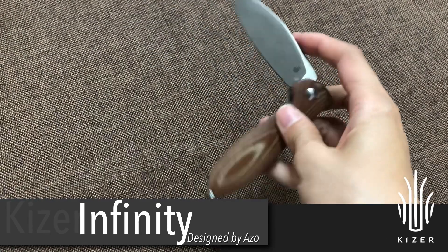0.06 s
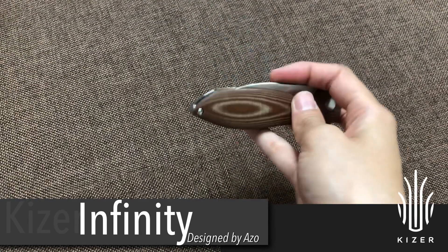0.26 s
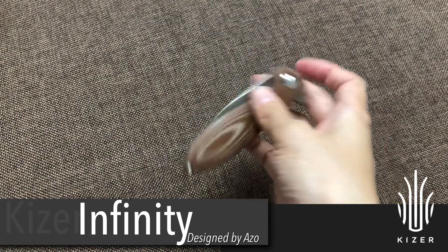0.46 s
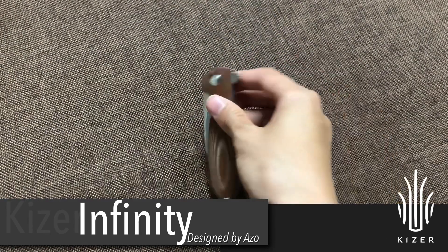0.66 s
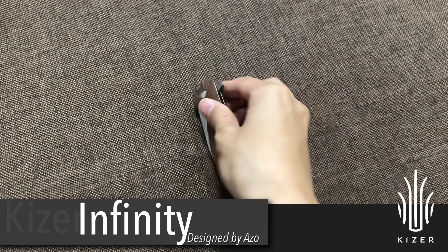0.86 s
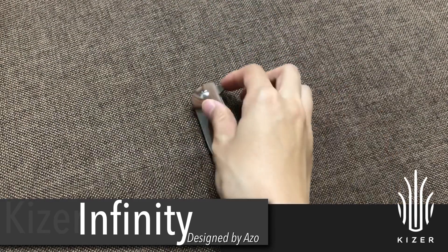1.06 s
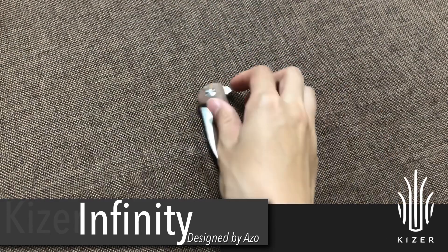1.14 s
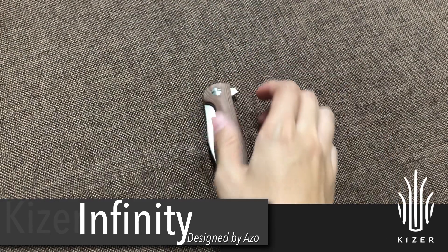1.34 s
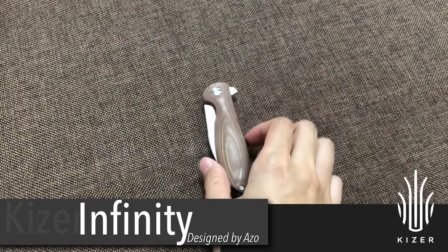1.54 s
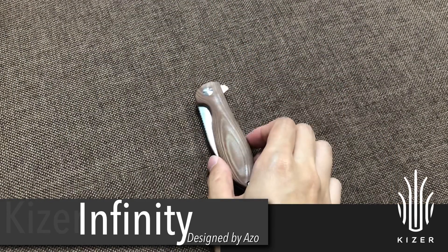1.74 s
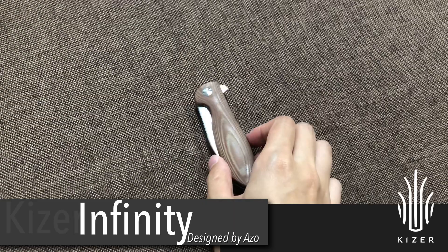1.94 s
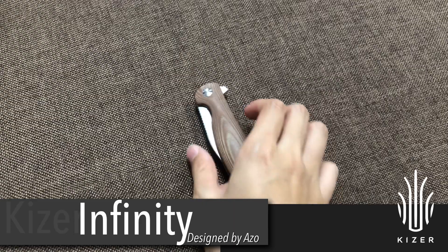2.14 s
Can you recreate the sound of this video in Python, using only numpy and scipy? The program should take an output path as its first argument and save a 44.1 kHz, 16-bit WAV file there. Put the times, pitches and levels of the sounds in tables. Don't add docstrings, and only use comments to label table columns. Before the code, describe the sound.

A folding pocket knife snaps with a loud, bright steel crack, then knocks dully on a cloth-covered hollow table, bounces and is set down softly; faint finger brushing follows, close microphone, quiet room.

```python
import sys
import numpy as np
from scipy import signal
from scipy.fft import rfft, irfft
from scipy.io import wavfile
from scipy.ndimage import uniform_filter1d

SR = 44100
rng = np.random.default_rng(int(sys.argv[2]) if len(sys.argv) > 2 else 0)


def persist_wave(psi):
    counts = np.round(np.clip(psi, -1, 1) * 32767).astype(np.int16)
    wavfile.write(sys.argv[1], SR, np.atleast_2d(counts).T)


def to_linear_factor(level_db):
    exponent = np.asarray(level_db, float) / 20
    return 10 ** exponent


N = 97020

# start in seconds, chatter length in seconds.
SNAP_CONTACTS = [
    (.2208, .004),
    (.2259, .0017),
    (.2274, .0009),
    (.2345, .0018),
    (.2362, .0012),
    (.2405, .002),
]
# level in dB, brightness in dB per octave, ring in dB.
SNAP_FORCE = [
    (-46, 3, 8),
    (-2.5, -1, -3.5),
    (-0.5, -5.5, -21),
    (-6, -0.5, -13),
    (-9, -1, -9),
    (-17, -5, -8.5),
]
# frequency in Hz, density in dB per Hz.
CRACK_SPECTRUM = [(1200, -39.5), (3300, -27.5), (5200, -19), (8700, -5), (11500, -2), (14500, -12),
                  (15500, -7.5), (16000, -33.5)]
# frequency in Hz, level in dB, T60 in seconds.
BLADE_MODES = [(1050, -21, 0.028), (1777, -23.5, .04), (2255, -27, .04), (3990, -24, 0.02),
               (5171, -14.5, 0.048), (6610, -18.5, 0.019), (7370, -18.5, 0.03), (7840, -15, 0.024),
               (9570, -15, .03), (11070, -8.5, .035), (12940, -14, .04), (12860, -9, 0.018),
               (13400, -15.5, 0.02), (15200, -16, 0.015)]
# frequency in Hz, level in dB, T60 in seconds.
STOP_MODES = [(370, -34.5, .03), (780.4, -34, .04), (910, -36, 0.045), (5175, -20, 0.059),
              (8637, -9.5, .06), (11060, -22, .05), (15560, -22, .04)]
# delay in seconds, level in dB.
SNAP_ECHOES = [
    (0.0252, -34),
    (0.0363, -29),
]
# start in seconds, level in dB.
WALL_CRACKS = [
    (0.2262, -8),
    (.2350, -13),
]
# frequency in Hz, density in dB per Hz.
WALL_SPECTRUM = [(600, -25), (1500, -22.5), (3000, -21.5), (5200, -10), (8000, -3), (11500, -2.5),
                 (16000, -3)]
# frequency in Hz, level in dB, T60 in seconds.
WALL_MODES = [(2256, -32, .02), (5140, -16, .015), (7270, -10, .008), (8720, -18, .015),
              (11000, -12, 0.011), (15200, -11.5, .006)]
# centre in Hz, width in Hz, level in dB, peak in seconds, length in seconds.
PIVOT_BANDS = [(1790, 150, -64.5, 0.12, 0.12), (3110, 210, -70, 0.062, 0.054),
               (4050, 300, -61, .155, 0.046), (6500, 680, -72, 0.057, 0.017), (6900, 500, -67, 0.18, 0.04),
               (8800, 180, -65, 0.22, 0.091), (10430, 250, -65.5, .05, 0.1), (12800, 400, -61.5, .13, .08),
               (14400, 400, -74, .14, .06), (6340, 3100, -66, 0.0051, 0.024), (5557, 1300, -61, 0.17, .06)]
# start in seconds, level in dB, pitch in Hz, ring in dB.
TICK_EVENTS = [(.008, -54.5, 10500, -21), (.2030, -46.5, 11100, -5.5), (.2120, -52.5, 13300, -16),
               (.2150, -50, 11300, 0), (.493, -60, 10750, -9.5), (.499, -57.5, 14300, -18.5),
               (.503, -58, 10730, -10), (.509, -59, 10700, -10), (.590, -51, 14000, -24.5),
               (0.6284, -34.5, 10440, -13.5), (0.629, -33.5, 3298, -13.5), (0.684, -46, 10750, -11),
               (.6836, -52, 14500, -11), (0.7339, -55, 9730, -25), (0.7414, -60, 10750, -5),
               (0.755, -63.5, 10700, -3), (0.7659, -58, 10700, -6), (0.7688, -47, 7700, -23),
               (.7690, -47, 2100, -10), (.7690, -52, 3370, -7), (.7780, -60.5, 10700, -7.5),
               (.8115, -51.5, 13200, -28), (0.8988, -48.5, 5500, -11.5), (.915, -51.5, 14700, -16),
               (0.921, -52.5, 14900, -12), (.930, -52.5, 14790, -17), (.9400, -50.5, 6200, -33)]
# start in seconds, level in dB, contact cut-off in Hz.
TABLE_KNOCKS = [
    (.6290, -12, 1330),
    (0.6346, -21, 1250),
    (0.6387, -19, 990),
    (0.767, -45, 1500),
    (0.9393, -32.5, 780),
    (0.9434, -33.5, 387),
]
# frequency in Hz, level in dB, T60 in seconds.
THUD_MODES = [(229, 3, 0.021), (337, 4, 0.025), (508.5, 1, 0.055), (656, -0.5, 0.022), (862, 0.5, 0.074),
              (1074, 0.5, 0.0136)]
# frequency in Hz, T60 in seconds.
TABLE_MODES = [(128.3, .5), (165.8, 1.1), (199, .33), (274, .12), (327, .45), (491, .25), (535, .33),
               (597, .28), (800, .4), (868, .36), (904, .36), (1020, .3), (1104, .31), (1180, .25)]
TABLE_STRUCK_DB = [-6.5, -1.5, -1.5, -4, -0.5, -10, -0.5, 1, -9, -1.5, -7.5, -20.5, -6.5, -5]
# start in seconds, length in seconds, pitch in Hz, level in dB.
ROCKS = [
    (0.95, 0.0477, 325, -30.5),
    (.965, 0.11, 165, -41.5),
    (.9395, 0.021, 206, -31),
]
# frequency in Hz, density in dB per Hz.
SHUDDER_SPECTRUM = [(150, -2), (500, -1), (1150, -7), (1500, -19), (2500, -22.5), (5000, -37)]
# start in seconds, pitch in Hz, level in dB, T60 in seconds.
FRAME_BUMPS = [
    (0.642, 79, -36.5, 0.23),
    (.950, 80, -39.5, 0.19),
    (1.004, 56.3, -37, 0.116),
]
# time in seconds, level in dB.
BRUSH_ENVELOPE = [(.45, -69.5), (.58, -58), (.66, -61.5), (.8, -57.5), (.87, -62), (.93, -62.5),
                  (.99, -59.5), (1.03, -71), (1.18, -67.5), (1.23, -63), (1.3, -59.5), (1.42, -62),
                  (1.52, -70), (1.9, -83), (2.05, -70.5), (2.2, -65)]
# frequency in Hz, density in dB per Hz.
CLOTH_SPECTRUM = [(700, -1.5), (1200, 1), (3000, -3), (5000, -5.5), (9000, -9.5), (16000, -13)]
# frequency in Hz, density in dB per Hz.
AIR_SPECTRUM = [(18, -30), (30, -3.5), (54, -2.5), (87, -10), (185, -8), (214, -9.5), (535, -19.5),
                (1500, -32), (1950, -65), (3300, -120)]
# frequency in Hz, density in dB per Hz.
HISS_SPECTRUM = [(880, -30), (1500, -4.5), (2400, -5.5), (2650, -6), (4970, -8), (6940, -9.5),
                 (15700, -11.5)]
# frequency in Hz, T60 in seconds, level in dB.
ROOM_DECAY = [(152.3, 0.87, -13.5), (586.7, 0.53, -11.5), (2446, 0.63, -12), (7200, 0.32, -9),
              (14000, 0.58, -23)]

STOP_S = SNAP_CONTACTS[1][0]
ATTACK_S, CRACK_T60_S = .0008, .004
RATTLE_DB, RATTLE_T60_S = -17, 0.037
BLADE_SPREAD_DB = 2.5
SEATED_S, SEATED_T60_S = .2445, .015
TICK_T60_S, TICK_WIDE_S = .01, .004
TABLE_DB = -15.5
SHUDDER_DB, SHUDDER_T60_S = -17.5, 0.48
PALM_S, PALM_T60_S = 1.042, .12
GRAINS_PER_S, GRAIN_SPREAD_DB = 9000, 1.5
AIR_DB, HISS_DB = -50.5, -65.5
FIRST_WALL_S, BUILD_S = 0.0063, 0.0089
RING_SEND_DB, TABLE_SEND_DB = -8.5, -6
OVERLOAD = 1.0


def at_hz(points, hz, axis=1):
    points = np.array(points)
    return np.interp(np.log(hz), np.log(points[:, 0]), points[:, axis])


def rms_one(x):
    return x / np.sqrt(np.mean(x ** 2) + 1e-20)


def filtered(x, order, hz, kind):
    return signal.sosfilt(signal.butter(order, hz, kind, fs=SR, output="sos"), x)


def gain_over_time(rows):
    s, db = np.transpose(rows)
    return to_linear_factor(np.interp(np.arange(N) / SR, s, db, left=-120, right=-120))


def colour(x, spectrum, tilt_db=0.):
    hz = np.maximum(np.fft.rfftfreq(len(x), 1 / SR), 1)
    inside = (hz >= spectrum[0][0]) & (hz <= spectrum[-1][0])
    gain = to_linear_factor(at_hz(spectrum, hz) + tilt_db * np.log2(hz / 8000))
    return irfft(rfft(x) * inside * gain, len(x))


def ring(x, hz, t60_s):
    r, w = to_linear_factor(-60 / (t60_s * SR)), 2 * np.pi * hz / SR
    return signal.lfilter([0, np.sin(w)], [1, -2 * r * np.cos(w), r * r], x + 1e-18)


def fade_after(start_s, t60_s):
    return to_linear_factor(-60 * np.maximum(np.arange(N) / SR - start_s, 0) / t60_s)


def add(out, s, x):
    i = int(s * SR)
    out[i:i + len(x)] += x[:N - i]


def contact_click():
    return np.pad(np.eye(1, 8132)[0], (60, 0))


def snap_cracks():
    out, t = np.zeros(N), np.arange(8192) / SR
    for (s, length_s), (db, tilt_db, _) in zip(SNAP_CONTACTS, SNAP_FORCE):
        after_s = np.maximum(t - length_s, 0)
        crack = to_linear_factor(-60 * after_s / CRACK_T60_S)
        rattle = to_linear_factor(RATTLE_DB - 60 * after_s / RATTLE_T60_S)
        shape = np.clip(t / ATTACK_S, 0, 1) * np.maximum(crack, rattle)
        noise = rng.standard_normal(len(t))
        add(out, s, to_linear_factor(db) * shape * rms_one(colour(noise, CRACK_SPECTRUM, tilt_db)))
    return out


def blade_rings():
    out, click = np.zeros(N), contact_click()
    for (s, _), (db, _, ring_db) in zip(SNAP_CONTACTS, SNAP_FORCE):
        for hz, mode_db, t60_s in BLADE_MODES:
            spread = rng.standard_normal()
            gain = np.sign(spread) * to_linear_factor(db + ring_db + mode_db + BLADE_SPREAD_DB * spread)
            add(out, s - .001, gain * ring(click, hz, t60_s))
    long_click = np.pad(click, (0, SR // 4))
    for hz, db, t60_s in STOP_MODES:
        add(out, STOP_S - .001, to_linear_factor(db) * ring(long_click, hz, t60_s))
    return out * fade_after(SEATED_S, SEATED_T60_S)


def snap_to_walls():
    out, click = np.zeros(N), contact_click()
    for s, db in WALL_CRACKS:
        add(out, s, to_linear_factor(db - 18.0) * rms_one(colour(click, WALL_SPECTRUM)))
    for hz, db, t60_s in WALL_MODES:
        add(out, STOP_S, to_linear_factor(db) * ring(click, hz, t60_s))
    return out


def blade():
    cracks, rings = snap_cracks(), blade_rings()
    direct = cracks + rings
    for delay_s, db in SNAP_ECHOES:
        add(cracks, delay_s, to_linear_factor(db) * direct)
    return filtered(cracks, 2, 800, "high"), rings, snap_to_walls()


def pivot():
    out, t = np.zeros(N), np.arange(N) / SR
    for hz, width_hz, db, peak_s, length_s in PIVOT_BANDS:
        flicker = rms_one(uniform_filter1d(rng.standard_normal(N), size=300))
        edges_hz = [hz - width_hz / 2, hz + width_hz / 2]
        rub = rms_one(filtered(rng.standard_normal(N), 1, edges_hz, "band"))
        out += to_linear_factor(db + 3.5 * flicker - 10 * ((t - peak_s) / length_s) ** 2) * rub
    return out * (t < STOP_S)


def ticks():
    out, t = np.zeros(N), np.arange(2048) / SR
    for s, db, hz, ring_db in TICK_EVENTS:
        puff = rng.standard_normal(len(t)) * to_linear_factor(-20 * t / TICK_WIDE_S)
        click = filtered(puff, 2, 1300, "high")
        add(out, s, to_linear_factor(db) * (click + to_linear_factor(ring_db) * ring(puff, hz, TICK_T60_S)))
    return out


def table():
    push, out = np.zeros(N), np.zeros(N)
    for s, db, cut_hz in TABLE_KNOCKS:
        add(push, s, to_linear_factor(db) * filtered(np.eye(1, 2000)[0], 3, cut_hz, "low"))
    for k, (hz, db, t60_s) in enumerate(THUD_MODES):
        out += (-1) ** k * to_linear_factor(db) * ring(push, hz, t60_s)
    for k, ((hz, t60_s), db) in enumerate(zip(TABLE_MODES, TABLE_STRUCK_DB)):
        out += (-1) ** k * to_linear_factor(TABLE_DB + db) * ring(push, hz, t60_s)
    for s, length_s, hz, db in ROCKS:
        t = np.arange(int(length_s * SR)) / SR
        add(out, s, to_linear_factor(db) * np.sin(np.pi * t / length_s) * np.sin(2 * np.pi * hz * t))
    return out


def shudder():
    out, t = np.zeros(N), np.arange(SR // 2) / SR
    for s, db, cut_hz in TABLE_KNOCKS:
        noise = rms_one(colour(rng.standard_normal(len(t)), SHUDDER_SPECTRUM))
        noise = filtered(noise, 2, 1.22 * cut_hz, "low")
        decay = to_linear_factor(db + SHUDDER_DB - 60 * t / SHUDDER_T60_S)
        add(out, s, decay * np.clip(t / 0.00099, 0, 1) * noise)
    return out


def bumps():
    out = np.zeros(N)
    push = np.pad(np.hanning(400) / 200, (0, SR // 2))
    for s, hz, db, t60_s in FRAME_BUMPS:
        add(out, s, to_linear_factor(db) * ring(push, hz, t60_s))
    return out


def cloth():
    hits = rng.random(N) < GRAINS_PER_S / SR
    size = to_linear_factor(GRAIN_SPREAD_DB * rng.exponential(1, N))
    grains = hits * rng.standard_normal(N) * size
    return to_linear_factor(0.5) * gain_over_time(BRUSH_ENVELOPE) * rms_one(colour(grains, CLOTH_SPECTRUM))


def room(x):
    t, tail = np.arange(SR // 2) / SR, 0
    edges_hz = 100 * 2 ** np.arange(0, 7.6, .5)
    for low, high in zip(edges_hz, edges_hz[1:]):
        band = filtered(rng.standard_normal(len(t)), 2, [low, high], "band")
        centre_hz = np.sqrt(low * high)
        t60_s, db = at_hz(ROOM_DECAY, centre_hz), at_hz(ROOM_DECAY, centre_hz, axis=2)
        tail = tail + band * to_linear_factor(db - 60 * t / t60_s) / 30
    build_up = np.clip((t - FIRST_WALL_S) / BUILD_S, 0, 1)
    return signal.fftconvolve(x, tail * build_up)[:N]


def air():
    tone = rms_one(colour(rng.standard_normal(N), AIR_SPECTRUM))
    hiss = rms_one(colour(rng.standard_normal(N), HISS_SPECTRUM))
    return to_linear_factor(AIR_DB) * tone + to_linear_factor(HISS_DB) * hiss


def scene():
    cracks, rings, walls = blade()
    palm = fade_after(PALM_S, PALM_T60_S)
    near = palm * filtered(table(), 3, 115, "high") + ticks()
    reverb = room(to_linear_factor(TABLE_SEND_DB) * near + walls + to_linear_factor(RING_SEND_DB) * rings)
    mix = near + cracks + rings + reverb + pivot() + shudder() + bumps() + cloth() + air()
    return mix[None]


def top_cut(x):
    return signal.sosfilt(signal.butter(12, 15840, fs=SR, output="sos"), x)


def record(dry):
    heard = filtered(dry, 3, 38, "high")
    return top_cut(np.clip(heard, -OVERLOAD, OVERLOAD))


dry = scene()
out = record(dry)
persist_wave(out)
```